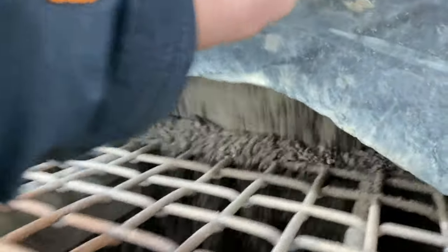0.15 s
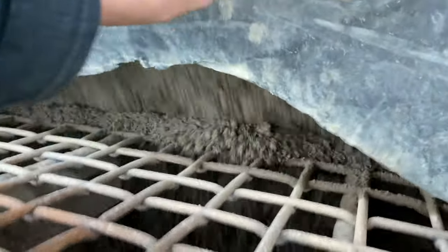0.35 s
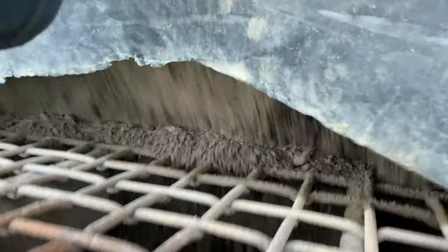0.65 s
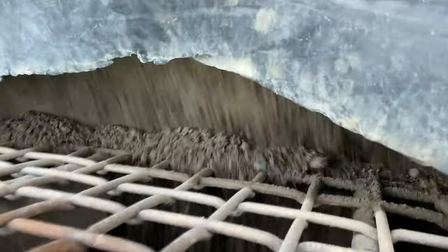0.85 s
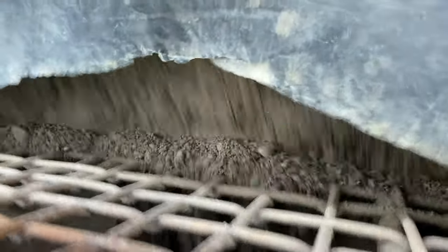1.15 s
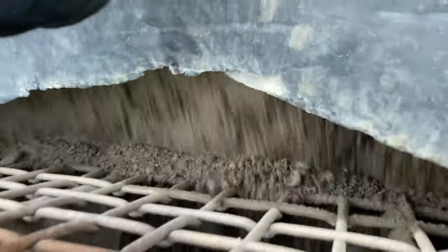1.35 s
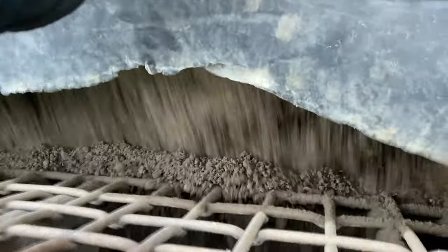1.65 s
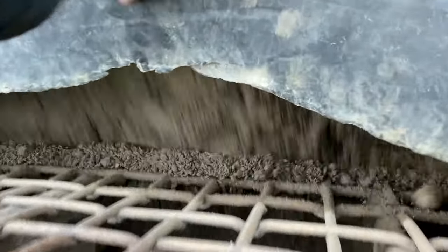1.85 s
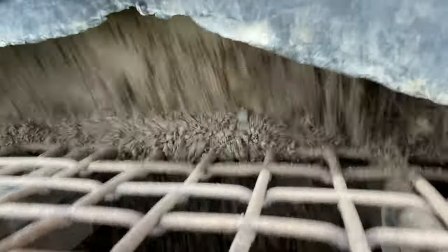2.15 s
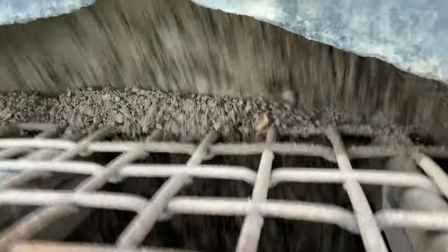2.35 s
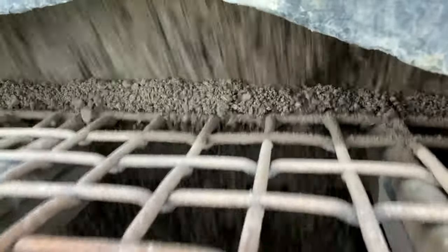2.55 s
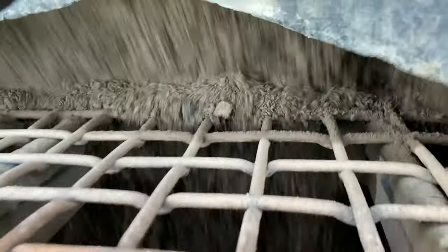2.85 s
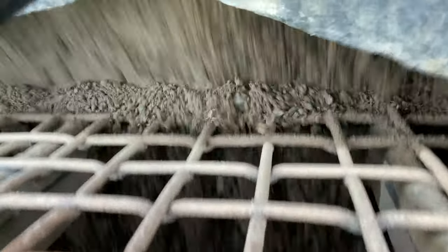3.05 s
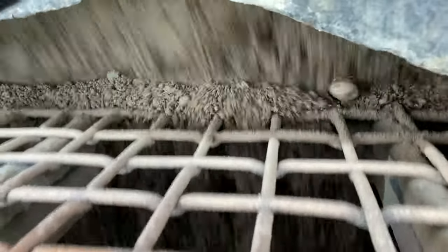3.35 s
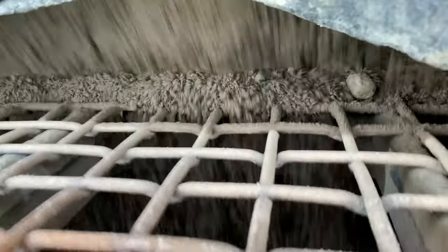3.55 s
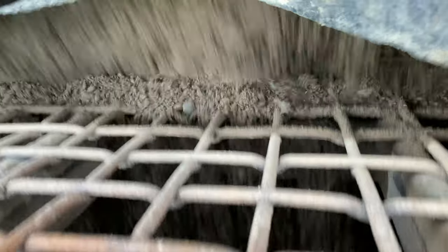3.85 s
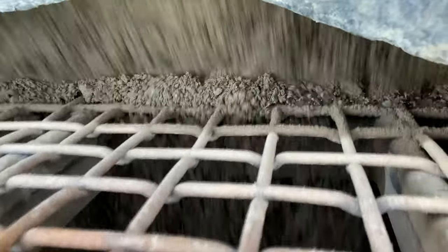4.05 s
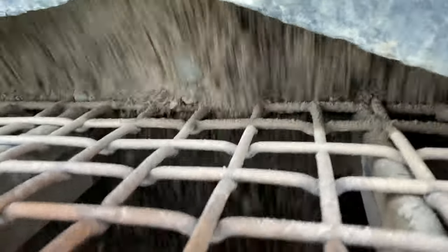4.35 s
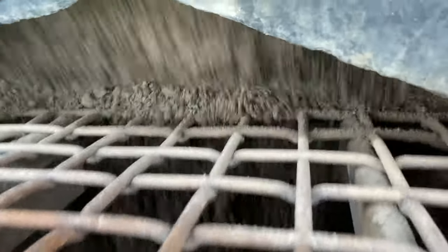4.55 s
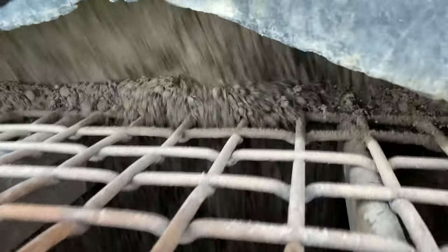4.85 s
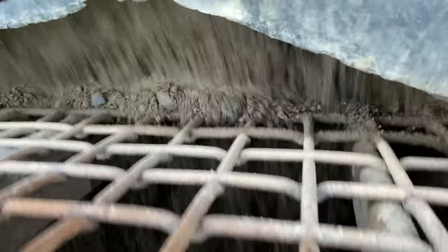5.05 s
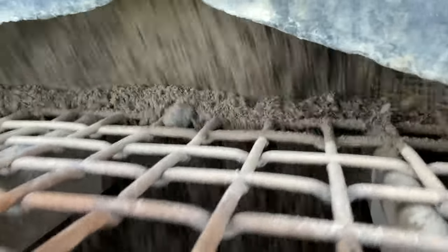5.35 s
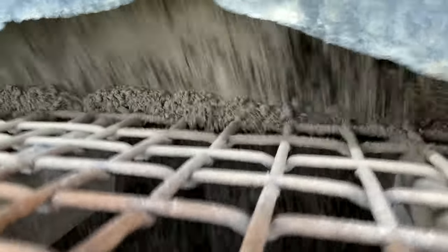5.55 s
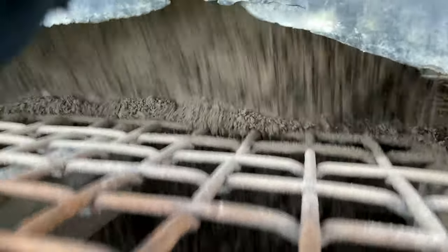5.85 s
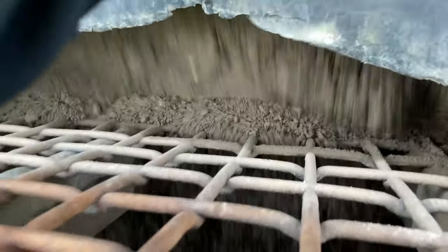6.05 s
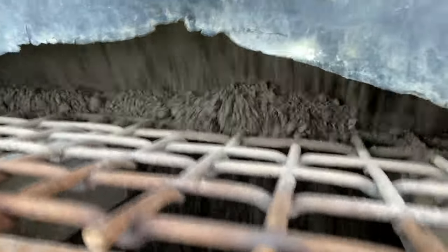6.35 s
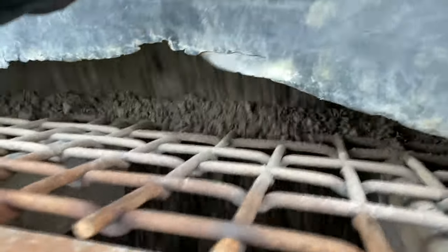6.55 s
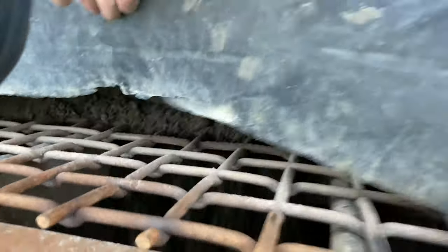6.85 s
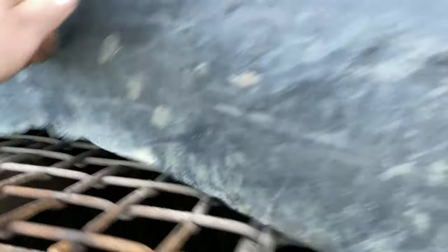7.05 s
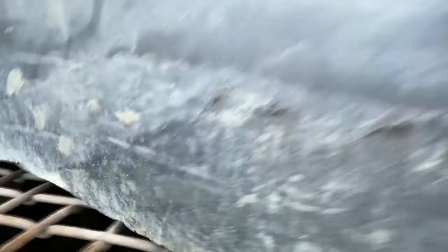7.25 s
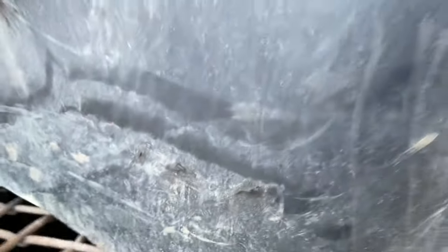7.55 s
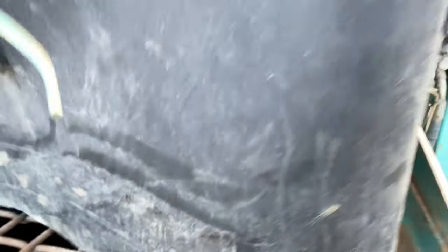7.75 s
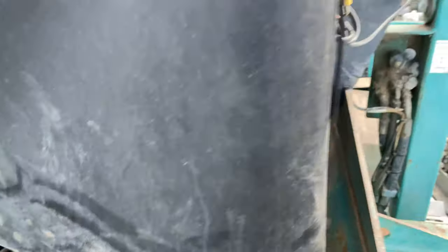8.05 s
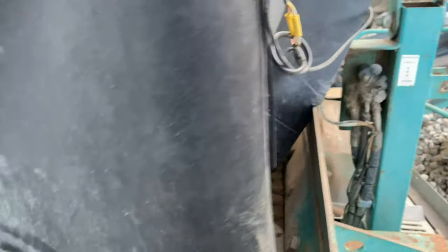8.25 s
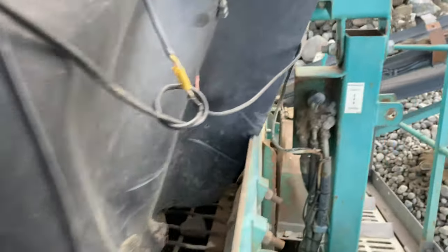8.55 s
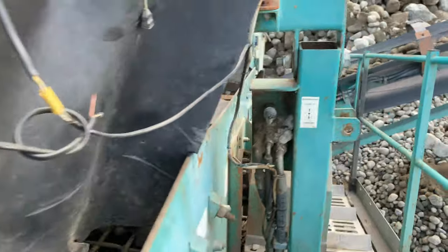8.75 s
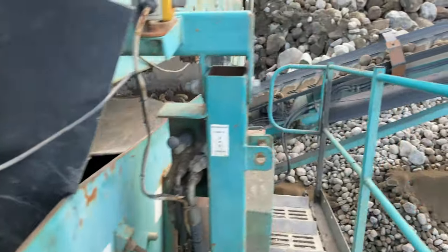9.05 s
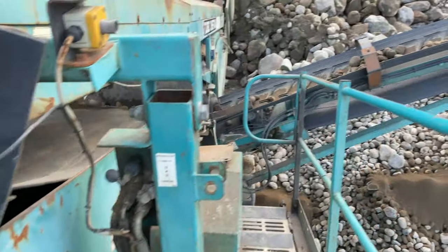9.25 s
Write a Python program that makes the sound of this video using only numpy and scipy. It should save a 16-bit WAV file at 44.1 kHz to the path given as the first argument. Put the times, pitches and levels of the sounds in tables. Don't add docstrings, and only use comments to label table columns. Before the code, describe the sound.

A dense, continuous roar of gravel and sand on wire mesh fills a handheld stereo microphone beside the machine deck. Under it lie a steady low engine drone and uneven steel boom. Random hard knocks, dry ticks and short metallic pings jump out. In the last second or two, the microphone swings off the deck; the low end weakens, the tone shifts and a distant conveyor's steady wash appears.

```python
import sys
import numpy as np
from scipy import signal
from scipy.fft import rfft, irfft, next_fast_len
from scipy.io import wavfile
from scipy.ndimage import uniform_filter1d, map_coordinates

SR = 44100
rng = np.random.default_rng(int(sys.argv[2]) if len(sys.argv) > 2 else 0)


def natural_amplitude(level_db):
    exponent = np.asarray(level_db, float) / 20
    return 10 ** exponent


def to_wav(sig):
    pcm = np.clip(np.atleast_2d(sig), -1, 1) * 32767
    pcm = np.round(pcm).astype(np.int16)
    wavfile.write(sys.argv[1], SR, pcm.T)


N = 414981


def unit(x):
    return x / np.sqrt(np.mean(x ** 2) + 1e-20)


def along(points, hz):
    f, v = np.transpose(points)
    return np.interp(np.log(hz + 1), np.log(f + 1), v)


def curves(rows):
    s, *cols = np.transpose(rows)
    return [np.interp(np.arange(N) / SR, s, c) for c in cols]


def swells(rows):
    t = np.arange(0, N, 32) / SR
    bells_db = sum(db * np.exp(-((t - s) / length) ** 2) for s, db, length in rows)
    return np.interp(np.arange(N) / SR, t, bells_db)


def wobble(rate):
    at = np.arange(0, N + 32, 32)
    knots = rng.standard_normal(int(N * rate / SR) + 4)
    return np.interp(np.arange(N), at, map_coordinates(knots, [at * rate / SR]))


def filtered(x, response):
    m = next_fast_len(N + SR // 4)
    return irfft(rfft(x, m) * response(np.fft.rfftfreq(m, 1 / SR)), m)[..., :N]


def band(noise, lo_hz, hi_hz):
    return unit(signal.lfilter(*signal.butter(2, [lo_hz, hi_hz], "band", fs=SR), noise))


def modes(rows, hz):
    return 1 + sum(natural_amplitude(db) * 1j * hz * w / (c * c - hz * hz + 1j * hz * w) for c, w, db in rows)


def patchy(depth_db):
    z = signal.stft(rng.standard_normal((2, N)), nperseg=512)[2]
    field = uniform_filter1d(rng.standard_normal(z.shape[1:]), size=6, axis=0)
    field = uniform_filter1d(field, size=6, axis=1)
    return signal.istft(z * natural_amplitude(depth_db * unit(field)), nperseg=512)[1][:, :N]


def impacts(per_second, spread_db, life_s, top_db):
    size_db = np.minimum(spread_db * rng.exponential(size=N), top_db)
    landings = (rng.random(N) < per_second / SR) * natural_amplitude(size_db)
    gate = signal.lfilter([1], [1, -np.exp(-1 / (life_s * SR))], landings)
    return unit(gate * rng.standard_normal((2, N)))


def pings(per_second, centre_hz, cycles):
    draw = rng.random((int(per_second * N / SR), 2))
    luck = rng.standard_normal((len(draw), 2))
    hz = np.clip(centre_hz * np.exp(.6 * luck[:, :1]), 500, 9000)
    t = np.arange(400) / SR
    strike = natural_amplitude(2.0 * np.minimum(luck[:, 1:], 1.5)) * np.sqrt(hz)
    ring = strike * np.sin(2 * np.pi * hz * t) * np.exp(-t * hz / cycles)
    row_length = N + len(t)
    at = (draw[:, :1] * N).astype(int) + np.arange(len(t)) + (draw[:, 1:] > .5) * row_length
    return unit(np.bincount(at.ravel(), ring.ravel(), 2 * row_length).reshape(2, -1)[:, :N])


# (time [s], level [dB])
BELT_LEVEL = [
    (0, -66),
    (8.5, -46),
    (8.8, -25.5),
    (9.41, -27),
]
# (frequency [Hz], density [dB per Hz])
BELT_COLOUR = [(150, -32), (260, 10), (370, 1.5), (480, -30), (750, -3), (1100, -1), (1500, -12),
               (1900, -5), (2400, -5), (3300, -10), (6000, -41)]


def belt():
    wash = filtered(patchy(depth_db=3.0), lambda hz: natural_amplitude(along(BELT_COLOUR, hz)))
    return natural_amplitude(curves(BELT_LEVEL)[0]) * unit(wash)


# (multiple of firing rate [1], level [dB])
ENGINE_ORDERS = [(.5, -40), (1, 2.5), (1.251, -12.5), (1.412, -53), (2.29, -12), (2.75, -17), (4.32, -17)]
# (time [s], gain [dB])
BACKING_OFF = [(0, 2), (.8, 0.5), (1.9, 1), (2.3, 0), (3.2, -1), (4.3, -1), (5.1, -2), (6, -1.5), (7, -2.5),
               (7.5, -2), (8.2, -4), (8.7, -5.5), (9.41, -8)]
# (time [s], level [dB], length [s])
FRAME_HEAVES = [(.26, 0, 0.09), (.39, -2, 0.098), (.525, 0, 0.028), (.79, 4, 0.11), (.9, -5, 0.035),
                (.98, 2, 0.099), (1.17, -0.5, .06), (1.27, 4, 0.082), (1.42, -1.5, .06), (1.54, 1.5, 0.045),
                (1.97, 2, 0.22), (2.07, -10, 0.02), (2.36, -4, 0.05), (2.54, 2.5, 0.035), (3.22, 7, 0.026),
                (4.32, 2, 0.076), (4.58, -0.5, 0.057), (5.95, 1.5, 0.18), (6.13, -1.5, 0.12),
                (6.26, 2.5, .06), (7.02, -4, 0.034), (7.18, 1.5, 0.045), (8.58, -5.5, 0.068),
                (8.66, 4.5, 0.21), (9.1, 3, 0.21), (9.35, 2, .1), (.08, -2, 0.093), (3.5, 2.5, 0.076)]


def engine():
    firing_hz = 73.82 + 0.12 * wobble(1.94)
    turn = 2 * np.pi * np.cumsum(firing_hz) / SR
    tones = 0
    for multiple, db in ENGINE_ORDERS:
        phase = 2 * np.pi * rng.random()
        tones = tones + natural_amplitude(db + 0.48 * wobble(3.14)) * np.sin(multiple * turn + phase)
    level_db = -22 + 0.9 * curves(BACKING_OFF)[0] + 0.18 * swells(FRAME_HEAVES)
    return natural_amplitude(level_db) * np.array([tones, 0 * tones])


# (frequency [Hz], density [dB per Hz])
FRAME_COLOUR = [(25, -44), (40, -22), (55, -6), (95, -4.5), (126, -2.5), (160, -4), (225, -2), (290, -4),
                (340, -10), (420, -24.5), (700, -43)]
# (frequency [Hz], width [Hz], level [dB])
PLATE_MODES = [(89.8, 4.9, -1.5), (127, 10.6, -3), (218.7, 25, -9), (298.5, 6.4, -17)]


def frame():
    boom = filtered(patchy(depth_db=0.54),
                    lambda hz: natural_amplitude(along(FRAME_COLOUR, hz)) * modes(PLATE_MODES, hz))
    level_db = -19.78 + 0.95 * curves(BACKING_OFF)[0] + swells(FRAME_HEAVES)
    return natural_amplitude(level_db) * unit(natural_amplitude(0.32 * wobble(8)) * boom)


# (time [s], peak [dB])
CHIP_TICKS = [(0.2254, -41), (0.4254, -24), (0.6245, -27), (0.6629, -32), (0.92, -27), (1.0924, -25),
              (1.3019, -28), (1.4511, -33), (1.4714, -34), (1.6621, -26), (1.919, -28), (1.9899, -34),
              (2.092, -27), (2.109, -23), (2.1595, -29), (2.3575, -21), (2.5232, -36), (2.6299, -35),
              (2.7836, -26), (2.8454, -32), (2.9537, -28), (2.9956, -29), (3.0717, -34), (3.3204, -26),
              (3.5996, -17), (4.0662, -32), (4.1155, -25), (4.1804, -31), (4.604, -26), (4.814, -21),
              (4.9322, -29), (4.987, -31), (5.308, -28), (5.441, -26), (5.8414, -29), (5.892, -32),
              (6.1464, -32), (6.4178, -35), (6.4742, -29), (6.5211, -23), (6.659, -25), (7.1716, -32),
              (7.3248, -34), (7.637, -27), (7.6909, -32), (7.8092, -29), (8.0711, -31), (8.1758, -34),
              (8.2287, -30), (8.3998, -29), (8.4961, -34), (8.5889, -29), (8.6053, -29), (8.6577, -24),
              (8.7126, -26), (8.7635, -31), (9.1082, -28), (9.193, -29), (9.2878, -38), (9.3546, -35)]


def chips():
    t = np.arange(SR // 25) / SR
    out = np.zeros((2, N + len(t)))
    for s, db in CHIP_TICKS:
        tick = natural_amplitude(db - 0.5 - 60 * t / 0.062) * rng.standard_normal((2, len(t)))
        out[:, round(s * SR):][:, :len(t)] += tick
    bright = signal.lfilter(*signal.butter(2, 6000, "high", fs=SR), out[:, :N])
    return bright * natural_amplitude([[0], [8]])


# (time [s], peak [dB], ring [Hz], spread [share of pitch])
WIRE_PINGS = [(0.627, -8, 3180, .06), (2.112, -15, 2150, .05), (2.132, -8, 1800, 0.11),
              (2.225, -19, 5200, 0.046), (2.8554, -16, 3000, .04), (3.601, -7.5, 4120, 0.092),
              (3.602, -18, 5660, .04), (4.4558, -28, 2990, .04), (4.8359, -4, 4030, .08),
              (4.837, -17, 5660, .04), (7.7109, -19, 2920, .04), (8.3903, -10, 2960, .04),
              (8.579, -10, 1500, .06)]


def wires():
    t = np.arange(SR // 25) / SR
    out = np.zeros((2, N + len(t)))
    envelope = np.exp(-(t / 0.014) ** 3) * (1 - np.exp(-t / .001))
    for s, db, hz, spread in WIRE_PINGS:
        ring = band(rng.standard_normal((2, len(t))), hz * (1 - spread), hz * (1 + spread))
        out[:, round(s * SR):][:, :len(t)] += natural_amplitude(db - 13) * envelope * ring
    return out[:, :N]


# (time [s], peak [dB], low ring [Hz], high ring [Hz])
BIG_STONES = [(0.3122, -5, 2280, 2970), (0.618, -3, 1530, 4500), (0.9812, -12, 2330, 3340),
              (1.5219, -10, 1660, 2910), (1.9165, -5.5, 1900, 2980), (2.1118, -5.5, 2100, 2800),
              (2.1306, -4.5, 780, 3800), (2.8554, -6, 855, 2990), (3.6009, 0, 1100, 4530),
              (4.0282, -11, 840, 4290), (4.119, -12, 2400, 3010), (4.6194, -6, 833, 3170),
              (4.8158, -7, 1870, 2660), (4.8354, -6, 2330, 4200), (4.9921, -7, 2370, 2910),
              (6.8588, -9, 764, 4180), (7.2823, -9, 2220, 3420), (7.4205, -14, 1460, 2940),
              (7.9079, -8.5, 748, 3500), (8.0685, -8, 1060, 3850), (8.1738, -11, 2230, 2970),
              (8.2287, -15, 934, 4550), (8.3903, -11, 2210, 2980), (8.5789, -9, 1480, 1920),
              (8.6582, -7, 815, 4800), (8.793, -6, 1510, 2830), (9.265, -6, 1960, 3060),
              (9.2853, -11, 1050, 4200), (9.3571, -9, 2170, 2900)]
# (time [s], peak [dB])
SMALL_STONES = [(0.7158, -10), (0.8724, -24), (1.043, -20), (1.5638, -23), (1.9964, -26), (2.6354, -4),
                (2.7417, -26), (3.179, -5.5), (3.9794, -11), (4.3067, -8), (4.4558, -19), (4.9317, -9),
                (5.0524, -9), (5.2879, -19), (6.0073, -10), (6.063, -20), (6.3789, -8), (6.4215, -8),
                (7.7109, -10), (8.332, -21), (8.4487, -17), (8.4936, -7.5), (8.557, -24), (8.7685, -12),
                (8.8458, -19), (9.3873, -7), (2.9552, -7), (4.232, -16), (5.4747, -16), (6.9456, -17),
                (7.0623, -15), (7.324, -8), (8.2816, -12), (8.706, -14), (8.8812, -18), (9.0887, -14)]


def stones():
    bar_low_hz, bar_high_hz = 863, 3080
    ring_db, crack_db = -21, -18
    t = np.arange(SR // 16) / SR
    out = np.zeros((2, N + len(t)))
    fade = np.exp(-(t / 0.012) ** 2) * (1 - np.exp(-t / 0.0015))
    small = [(s, db, bar_low_hz, bar_high_hz) for s, db in SMALL_STONES]
    for s, db, low_hz, high_hz in sorted(BIG_STONES + small):
        noise = rng.standard_normal((4, 2, len(t)))
        chatter = 0.52 * band(noise[0], 450, 3000)
        low_ring = 0.5 * band(noise[1], low_hz * 0.943, low_hz * 1.01)
        high_ring = natural_amplitude(ring_db) * band(noise[2], high_hz * 0.89, high_hz * 0.96)
        crack = natural_amplitude(crack_db - 60 * t / 0.045) * band(noise[3], 3800, 15000)
        hit = fade * (0.71 * (chatter + low_ring) + high_ring) + crack
        out[:, round(s * SR):][:, :len(t)] += natural_amplitude(db - 6.0) * hit
    return out[:, :N]


# (frequency [Hz], density [dB per Hz])
GRAVEL_COLOUR = [(150, -35), (300, 0), (380, 1), (500, 2), (640, 1), (870, 1.5), (1250, -2.5), (1600, -4.5),
                 (2500, -10.5), (3500, -15.5), (6000, -30.5), (9000, -58)]
# (frequency [Hz], density [dB per Hz])
SAND_COLOUR = [(800, -5), (2000, -3.5), (3000, 0), (4200, -4.5), (5100, -4.5), (5400, -7.5), (6500, -16.5),
               (7700, -6), (10000, -7.5), (12500, -19), (15000, -14), (16500, -34)]
# (frequency [Hz], width [Hz], level [dB])
MESH_MODES = [(887, 25, -10), (1095, 26, -9), (1830, 99, -6), (4170, 140, -15.5), (5750, 130, 1.5),
              (6450, 160, 5)]
# (time [s], load [dB], stroke depth [dB])
FEED_LOAD = [(0, 1, 1.5), (.6, 2, 1.4), (1.05, 1.5, 2), (1.4, 1, 1.3), (2.1, 2, 1.9), (2.45, 1, 0.8),
             (3.3, 0.5, 1.3), (3.7, 0, 1.5), (4.2, 1.7, 2), (4.7, -0.5, 1.5), (5.1, 1.3, 1.5),
             (5.9, 0.8, 1.8), (6.3, 1.5, 2), (7.1, -0.5, 2), (7.8, -.5, 2), (8.4, 1.5, 2.8),
             (8.8, -0.1, 2.1), (9.41, .5, 3)]
# (time [s], level [dB], length [s])
STREAM_CLUMPS = [(.6, -2, .02), (.63, -1.5, 0.022), (1.1, 3.5, 0.018), (1.13, 1, .02), (2.12, 3.5, 0.02),
                 (2.17, -2.5, 0.024), (2.25, 2.5, 0.028), (2.29, -3.5, 0.045), (3.41, -3.5, 0.034),
                 (3.47, 2.5, 0.075), (3.64, 1, 0.024), (4.35, 3, 0.03), (4.63, 3, 0.057), (4.77, 1, .04),
                 (4.85, 3, .03), (5.06, 1.5, 0.053), (5.19, -2, .05), (5.29, 1, .03), (6.08, 1.5, 0.12),
                 (6.14, -4, 0.037), (6.21, 0, 0.031), (6.37, -1.5, 0.049), (7.19, 4, 0.035),
                 (7.66, 2.5, 0.019), (7.78, -2, 0.024), (8.07, 3.5, 0.027), (8.15, -1.5, .04),
                 (8.36, 4.5, 0.017), (8.54, -4, 0.024), (8.58, 3, 0.064), (9.39, 1.5, 0.027),
                 (4.13, 2.5, 0.016), (6.01, 0, 0.017), (7.43, 1.5, 0.029), (8.45, 0.5, 0.013),
                 (8.5, -1, .015), (0.03, -2, 0.18)]
# (time [s], lag [rad])
STROKE_LAG = [(0, -.2), (.7, .05), (1.3, -.25), (2, .2), (2.7, -.35), (4, 0), (4.7, .45), (6, .55),
              (6.7, -.2), (8, -.35), (9.41, -.3)]


def pour():
    load_db, depth_db = curves(FEED_LOAD)
    backing_db, lumps_db = curves(BACKING_OFF)[0], swells(STREAM_CLUMPS)
    gravel_db = -21.5 + 0.5 * backing_db + load_db + lumps_db
    sand_db = -29.5 + 0.49 * backing_db + load_db + 0.82 * lumps_db
    stroke_hz, start_turns = 18.766, .324
    turn = 2 * np.pi * (stroke_hz * np.arange(N) / SR + start_turns) - curves(STROKE_LAG)[0]
    stroke_db = depth_db * (np.cos(turn) - .2 * np.sin(2 * turn)) * natural_amplitude(2.2 * wobble(8))
    unsteady_db = 0.45 * wobble(5) + 0.55 * wobble(14) + 0.8 * wobble(40)
    swing_db = stroke_db + unsteady_db
    rattle = patchy(depth_db=1.5)
    rattle = rattle + 0.4 * impacts(per_second=150, spread_db=3, life_s=0.004, top_db=10)
    hiss = patchy(depth_db=1.4)
    hiss = hiss + 0.55 * impacts(per_second=400, spread_db=5, life_s=0.002, top_db=11)
    hiss = hiss + .4 * pings(per_second=700, centre_hz=2800, cycles=9.5)
    gravel = unit(filtered(rattle, lambda hz: natural_amplitude(along(GRAVEL_COLOUR, hz)) * modes(MESH_MODES, hz)))
    sand = unit(filtered(hiss, lambda hz: natural_amplitude(along(SAND_COLOUR, hz)) * modes(MESH_MODES, hz)))
    return natural_amplitude(gravel_db + 0.45 * swing_db) * gravel + natural_amplitude(sand_db + 0.9 * swing_db) * sand


def scene():
    return belt() + engine() + frame() + chips() + wires() + stones() + pour()


# (frequency [Hz], likeness [0-1])
PORTS_ALIKE = [(60, 0.79), (250, 1), (350, 0.55), (700, 0.9), (950, 0.42), (1500, 0.71), (2100, 0.64),
               (2800, 0.41), (4000, 0.19), (6800, 0.069)]
# (frequency [Hz], likeness [0-1])
AWAY_ALIKE = [(900, 0.05), (1250, 0.33), (1600, 0)]
# (frequency [Hz], likeness [0-1])
TREBLE_ALIKE = [(7700, .95), (8500, .95), (9500, .94), (11000, .95), (13500, .9)]
# (frequency [Hz], lead [rad])
LEFT_LEAD = [(0, 0), (330, .65), (450, 2.5), (690, 3.5), (1120, 3.3), (1900, 4.1), (2760, 7.5), (4570, 13),
             (6120, 17.8), (7500, 22.65), (9400, 21.3), (11000, 18.85), (13400, 15.7), (15700, 13.2)]
# (frequency [Hz], lead [rad])
AWAY_LEAD = [(500, 0), (850, -1.3), (950, -1.4), (1150, -.5), (1300, .05), (1450, .3), (2000, .3),
             (2600, 0)]
# (frequency [Hz], level [dB])
OVERALL_COLOUR = [(300, 0), (430, 1.5), (650, 0), (1100, 0), (1400, 2.5), (1750, 0), (5100, 0), (5500, -3),
                  (5800, 0), (7000, 0), (7600, -3.5), (8700, -6.5), (9300, -6), (9700, -2.5), (10500, -1),
                  (12000, 0), (14000, -2), (15100, -5.5), (15800, -7)]
# (frequency [Hz], level [dB])
AWAY_COLOUR = [(250, -3), (550, -2.5), (800, -2), (1000, -1.5), (1220, -3), (1450, 2), (1800, 2),
               (2100, 1.5), (2600, 0), (3300, -1.5), (4500, 1), (6500, -8), (8500, 3.5), (12000, -7)]


def ports(dry, left_db, turned):
    def response(hz):
        single = np.interp(hz, (7100, 7700), [0, 1])
        alike = along(PORTS_ALIKE, hz) + turned * along(AWAY_ALIKE, hz)
        alike = alike + single * (along(TREBLE_ALIKE, hz) - alike)
        share = np.arccos(np.clip(alike, 0, 1)) / 2
        direct, scatter = np.cos(share), np.sin(share)
        lead = np.interp(hz, *np.transpose(LEFT_LEAD)) + turned * along(AWAY_LEAD, hz)
        half = natural_amplitude((1 - single) * along(left_db, hz) / 2) * np.exp(.5j * lead)
        mix = np.array([[half * direct, half * scatter], [direct / half, -scatter / half]])
        colour = natural_amplitude(along(OVERALL_COLOUR, hz) + turned * along(AWAY_COLOUR, hz))
        return mix * colour * np.interp(hz, (15740, 15800), [1, .04]) ** 2
    return filtered(dry, response).sum(axis=1)


def roll_off(x):
    return signal.sosfilt(signal.butter(12, 16920, fs=SR, output="sos"), x)


# (time [s], share turned away [0-1])
TURN_AWAY = [
    (0, 0.13),
    (7.2, 0.18),
    (7.9, 0.64),
    (8.4, 0.83),
    (8.8, 0.6),
    (9, 0.2),
    (9.41, 0.7),
]
# (frequency [Hz], left over right [dB])
FACING_LEFT = [(60, -3), (92, 2.5), (140, 0.5), (210, 0), (330, -1.5), (500, 6), (770, 7.5), (1170, 2.5),
               (1790, 2.0), (2740, 0.5), (4190, 7.5), (6410, 8), (9810, -15), (15000, -5.5)]
# (frequency [Hz], left over right [dB])
AWAY_LEFT = [(60, -6), (110, 7), (200, 3.5), (380, -4.5), (600, 7), (850, 15.5), (1200, 2), (1700, 3),
             (2400, 1), (4400, 5.5), (6500, 15)]


def record(dry):
    away = np.clip(curves(TURN_AWAY)[0], 0, 1)
    facing = ports(dry, FACING_LEFT, turned=False)
    turned = ports(dry, AWAY_LEFT, turned=True)
    heard = (1 - away) * facing + away * turned
    heard = heard / (1 + np.abs(heard / .98) ** 8) ** (1 / 8)
    return roll_off(heard)


dry = scene()
out = record(dry)
to_wav(out)
```